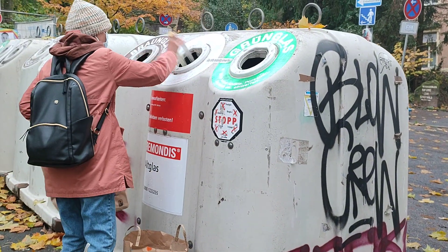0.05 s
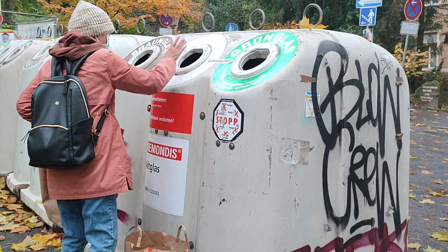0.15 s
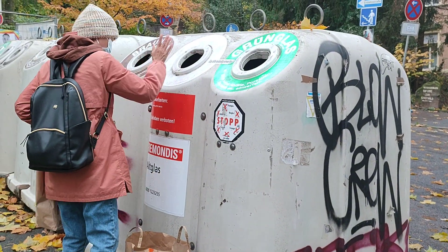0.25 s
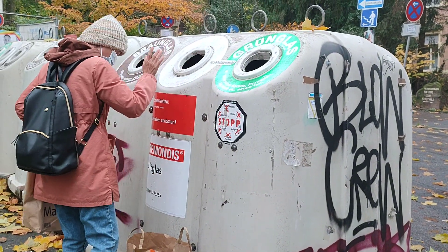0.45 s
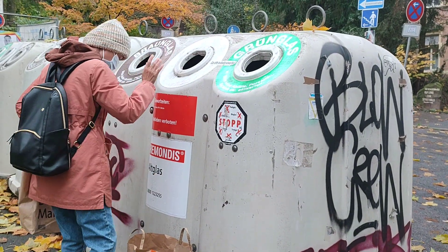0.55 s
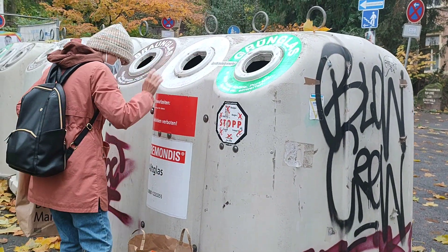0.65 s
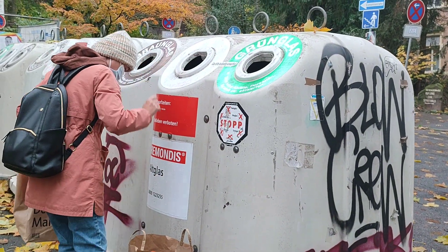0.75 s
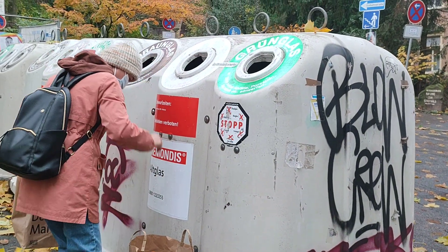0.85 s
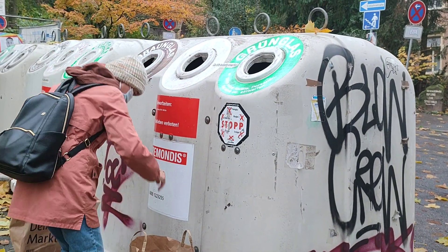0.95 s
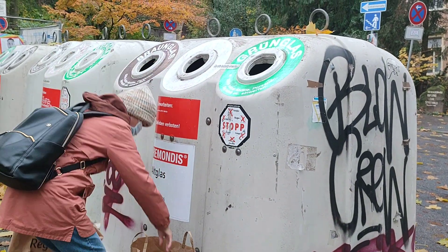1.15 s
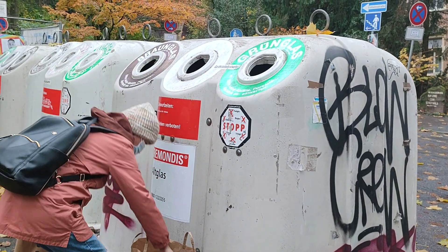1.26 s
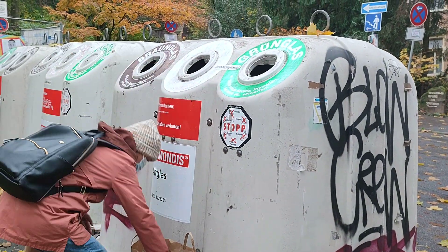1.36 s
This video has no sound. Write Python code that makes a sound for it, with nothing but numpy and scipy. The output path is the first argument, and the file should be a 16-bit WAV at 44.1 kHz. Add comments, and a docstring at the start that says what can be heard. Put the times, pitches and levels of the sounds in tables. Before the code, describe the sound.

Glass clinks and knocks as a bottle falls into a big street container, faint traffic behind

```python
"""Traffic rumbles and hisses far away throughout: shaped noise with drifting level.
Glass bottles scrape a street recycling container's rim (gritty noise bursts), then clink against the pile
(decaying modes per glass object). The big shell booms when one lands (low modes); weaker clinks, scrapes
and thuds follow, with a quick double knock on a small box. The hollow container answers (decaying noise tail)."""
import sys
import numpy as np
from scipy import signal
from scipy.fft import rfft, irfft, next_fast_len
from scipy.io import wavfile
from scipy.ndimage import uniform_filter1d, map_coordinates

SR = 44100
rng = np.random.default_rng(int(sys.argv[2]) if len(sys.argv) > 2 else 0)


def persist_wave(psi):
    """Save psi, clipped to +-1, as 16-bit WAV."""
    counts = np.round(np.clip(psi, -1, 1) * 32767).astype(np.int16)
    wavfile.write(sys.argv[1], SR, np.atleast_2d(counts).T)


def to_linear_factor(level_db):
    """Convert decibel levels (scalar or array-like) to linear amplitude factors."""
    exponent = np.asarray(level_db, float) / 20
    return 10 ** exponent


N = 61739

# modes of each glass object, beamed differently to each side: pitch_hz, left_db, right_db, t60_s
NECK_MODES = [(2793, -1.5, 3.5, 0.078), (3380, -23, -20, 0.065), (3795, -14.5, -13, 0.6),
              (4750, -23, -16, 0.1), (5940, -19, -14, 0.077), (6470, -16, -12, 0.096),
              (7200, -35, -33, 0.072), (7800, -22, -32, 0.069), (8600, -13.5, -35, 0.064),
              (11250, -13.5, -22, 0.067), (11360, -18, -30, 0.081), (12100, -25, -28, .08),
              (12300, -26, -28, 0.061), (13070, -18, -27, 0.045), (13910, -33, -27, .08)]
THIN_MODES = [(2304, -20, -4.5, 0.068), (2480, 0, -13, 0.044), (3670, -12, -29, 0.054),
              (4253, -10, -7, 0.065), (4500, -13, 0, 0.075), (6900, -13, -28, .06), (7120, -22, -9, 0.069),
              (7450, -20, -29, 0.046), (8737, -16, -40, 0.056), (10150, -17, -27, 0.068),
              (11540, -25, -33, .05), (11540, -26, -25, .08), (12750, -36, -36, 0.071),
              (13910, -27, -30, 0.088)]
THICK_MODES = [(2325, -11.5, -22, 0.25), (2487, -29, -8.5, 0.23), (2683, -3, -2.5, 0.25),
               (2901, -0.5, -10, 0.068), (3363, -4.5, -2, 0.058), (4660, -27, -1, 0.043),
               (4590, -14, -26, 0.089), (7063, -34, -23.5, 0.6), (7850, -38, -37, 0.048),
               (8580, -29, -39, .1), (11000, -39, -43, 0.1), (12160, -36, -40, 0.11),
               (13100, -43, -41, 0.086)]
ROUND_MODES = [(2292, -9, -1.5, 0.2), (2694, -6, -2, 0.16), (3050, -12.5, -8, 0.15), (3324, 1.5, -5, 0.095),
               (3555, -12, -2.5, 0.045), (4610, -7, -8.5, 0.062), (7050, -34, -18, 0.054),
               (8870, -17, -39, 0.047), (12680, -28, -28, 0.043)]
SMALL_MODES = [(2918, -4, 1, 0.16), (3085, 2, -14, 0.15), (3500, 1, 6.5, 0.061), (3715, 3.5, -6, .1),
               (4220, -18, -8, .12), (4660, -14, -1.5, 0.14), (6702, -7, -6, 0.086)]
FLAT_MODES = [(2917, -2.5, 2, 0.13), (3289, 3, -34, 0.057), (4110, -23, 1.5, 0.062),
              (4620, -16, -27, 0.077), (4640, -32, -17, 0.075)]
JAR_MODES = [(1500, 5, 6.5, 0.16), (4430, -15, -18, .1), (7180, -26, -17, 0.11), (12000, -25, -30, 0.057)]
GLASS_OBJECTS = [NECK_MODES, THIN_MODES, THICK_MODES, ROUND_MODES, SMALL_MODES, FLAT_MODES, JAR_MODES]
# contacts, one list per glass object in that order: start_s, level_db, rise_s, tilt_db_per_octave
CLINK_BLOWS = [
    [(.394, -16, 0.0061, 1.4), (.411, -16, 0.0028, -4)],
    [(.436, -10.5, 0.0043, -0.9), (.456, -21.5, 0.0014, -0.1)],
    [(.465, -18, 0.0013, 0.7), (.486, -24.5, 0.0033, 5.6)],
    [(.773, -29.5, 0.0036, 1), (.781, -25.5, 0.001, 4.4)],
    [(0.909, -36, 0.0028, 2.7)],
    [(1.018, -33, 0.0038, 7.5), (1.024, -25, 0.0029, -21)],
    [(.468, -42, 0.006, -9.2), (.5, -28, 0.048, -12.2), (.842, -52.5, 0.0047, 13.5),
     (.895, -38, 0.0092, -7), (.912, -34.5, 0.0023, -3), (.99, -62.5, 0.0027, 10.5),
     (1.1, -37.5, 0.0033, -0.3)],
]
# rim and pile scrapes: start_s, level_db, hold_s, t60_s, tilt_db_per_octave
SCRAPE_BURSTS = [(0.2334, -24, 0.0083, 0.036, 0.4), (0.244, -33.5, 0.0051, 0.066, -2),
                 (0.2531, -24.5, 0.0056, 0.041, -1.1), (.392, -30.5, 0.0056, 0.043, 1),
                 (0.395, -25, 0.006, 0.11, 0.5), (.431, -32, 0.0036, 0.13, 1),
                 (.436, -28, 0.0033, 0.12, 0.1), (0.46, -29.5, 0.004, 0.22, 2.8),
                 (.594, -36, 0.011, 0.16, 4.8), (0.771, -36, .015, 0.16, 4.2), (0.839, -48, 0.0072, .2, 6),
                 (.893, -40, 0.0087, 0.065, 0.1), (0.907, -40.5, 0.019, 0.27, 1.9),
                 (1.017, -37, .02, 0.11, -1.9), (1.095, -43.5, 0.014, 0.48, -2.7),
                 (1.197, -52, 0.03, 0.24, 0.2)]
# scrape noise colour: freq_hz, relative_db_per_hz
SCRAPE_SPECTRUM = [(88, -27), (150, -3.5), (343, -5.5), (495, -4.5), (787, -1), (3210, -8), (4210, -11),
                   (5720, -17), (7210, -16), (10400, -26.5), (12100, -25.5), (15000, -50)]
# scrape weighting, left over right: freq_hz, left_minus_right_db
SCRAPE_SIDES = [(60, -0.5), (110, 0.0), (200, 4), (380, 7.5), (690, 0.5), (1280, -6.5), (2350, -5),
                (4330, -7), (7980, 0), (14700, 2)]
# container shell modes: pitch_hz, relative_db, t60_s
SHELL_MODES = [(69, -13, 0.27), (99.2, -2.5, 0.11), (135.4, 0, 0.12), (165.3, 3.5, 0.088), (193, 2, .16),
               (247.8, 2, 0.099), (325.3, -1, 0.11), (382.4, -2.5, 0.089), (474, -22, 0.11),
               (605.5, -4.5, 0.078), (734, -13, .07), (763.5, -13, 0.12), (831, -20.5, 0.21)]
# blows on the shell: start_s, level_db, hardness_db_per_octave
SHELL_BLOWS = [(0.253, -38, -14), (.393, -42, 9.5), (.468, -32, -2.8), (0.496, -38.5, -15),
               (.594, -15.5, 2), (.602, -15.5, -8.5), (.609, -23, 0.5), (.626, -41.5, 8), (.643, -30, 0.1),
               (0.656, -31, -6), (.685, -40.5, 3), (0.776, -36.5, 0.3), (.83, -47, -18), (0.864, -42.5, -8),
               (.91, -39, 4.9), (1.1, -47.5, -9), (1.2, -44, 0), (1.286, -45, -10)]
# modes of a smaller hollow box: pitch_hz, relative_db, t60_s
BOX_MODES = [(156.4, 5, 0.052), (342, -9, 0.11), (523, -10, 0.14), (689, -9, 0.11)]
# its knocks: start_s, level_db
BOX_BLOWS = [(1.0225, -26.5), (1.035, -26.5)]
# container reverberation: freq_hz, t60_s
HOLLOW_DECAY = [(150, 0.86), (1000, 0.29), (4000, 0.65), (12000, 0.32)]
# left-right likeness of noise and reverberation: freq_hz, correlation
LIKENESS = [(60, 0.99), (130, 0.96), (290, 0.86), (630, 0.19), (1390, 0.079), (3050, -0.036), (6700, 0.055),
            (14700, -0.017)]
# tyre hiss colour: freq_hz, relative_db_per_hz
HISS_SPECTRUM = [(53, -34), (90, -1), (222, -9.5), (263, -4.5), (348, -6.5), (450, -14), (490, -8.5),
                 (1040, -10), (1210, -12.5), (2150, -10), (2610, -19), (2780, -20), (3310, -22.5),
                 (13300, -46.5), (15200, -64)]
# tyre hiss course before trim: time_s, relative_level_db
HISS_COURSE = [(0.0, -46.5), (0.466, -45.5), (0.552, -44.5), (1.004, -46.5), (1.144, -49.5), (1.4, -48.5)]
# engine rumble colour: freq_hz, relative_db_per_hz
RUMBLE_SPECTRUM = [(12, -38), (20, -17.5), (48, -2.5), (61, -6), (81, -15.5), (110, -14), (140, -23),
                   (240, -120)]
# engine rumble course before trim: time_s, relative_level_db
RUMBLE_COURSE = [(0.0, -39), (0.22, -42), (0.392, -38.5), (0.786, -37), (1.156, -38.5), (1.4, -42.5)]
# microphone response: freq_hz, gain_db
MIC_RESPONSE = [(3300, 1.11), (4800, 3.5), (5900, 1), (7200, 7.5), (8600, 1.3), (9300, 0.7), (9800, -9.1),
                (10500, -2), (11500, 0), (13500, 2)]

MODE_SPREAD_DB = .8  # chance level of each mode, per blow
FLUTTER_DB, FLUTTER_KNOTS_PER_S, FLUTTER_HALF_GROWN_S = 2.5, 70, .03
SHIMMER_DB, SHIMMER_TILT_DB_PER_OCTAVE, SHIMMER_MEAN_T60_S = -19, -7.5, 0.096
SHIMMER_LOW_HZ, SHIMMER_HIGH_HZ = 2400, 14200
SCRAPE_RISE_S, GRIT_DB, GRIT_KNOTS_PER_S = 0.00087, 1.8, 900
THUD_RISE_S, SHELL_CUT_HZ = .0015, 61  # the shell radiates little below the cut
GLASS_HOLLOW_DB, BOOM_HOLLOW_DB = -11.5, -14  # sends to the reverberation
HISS_TRIM_DB, RUMBLE_TRIM_DB = 4.5, -3.2


def unit(x):
    """Scale to rms 1."""
    return x / np.sqrt(np.mean(x ** 2) + 1e-20)


def along(points, hz):
    """Interpolate (freq_hz, value) points on a log frequency axis."""
    freq_hz, value = np.transpose(points)
    return np.interp(np.log(hz + 1), np.log(freq_hz + 1), value)


def curve(points):
    """Interpolate (time_s, value) points, one value per sample."""
    return np.interp(np.arange(N) / SR, *np.transpose(points))


def wobble(knots_per_s, size=N):
    """Smooth random curve through normal random knots."""
    knots = rng.standard_normal(int(size * knots_per_s / SR) + 4)
    return map_coordinates(knots, [np.arange(size) * knots_per_s / SR])


def filtered(x, response):
    """Multiply the spectrum of x by a function of frequency."""
    n = x.shape[-1]
    padded = next_fast_len(n + 8192)
    return irfft(rfft(x, padded) * response(np.fft.rfftfreq(padded, 1 / SR)), padded)[..., :n]


def add(into, start_s, sound):
    """Mix a stereo sound in at a time."""
    part = into[:, round(start_s * SR):][:, :sound.shape[1]]
    part += sound[:, :part.shape[1]]


def spread(pair, spectrum):
    """Colour two unrelated noises and blend them into a left and a right that agree in the bass."""
    def angle(hz):
        return np.arccos(np.clip(along(LIKENESS, hz), -1, 1)) / 2

    mid, side = filtered(pair, lambda hz: spectrum(hz) * [np.cos(angle(hz)), np.sin(angle(hz))])
    return unit(np.array([mid + side, mid - side]))


def ring(hz, left_db, right_db, t60_s, rise_s, apart_rad):
    """Struck modes: fluttering exponential decays, new levels per blow, a phase gap between the sides."""
    t = np.arange(SR // 3) / SR
    flutter = np.array([wobble(FLUTTER_KNOTS_PER_S, size=len(t)) for _ in hz])
    flutter_db = FLUTTER_DB * flutter * t / (t + FLUTTER_HALF_GROWN_S)
    chance_db = MODE_SPREAD_DB * rng.standard_normal((len(hz), 1))
    decay_db = -60 * t / np.reshape(t60_s, (-1, 1))
    decay_db = np.broadcast_to(decay_db, flutter.shape)
    fade = to_linear_factor(chance_db + flutter_db + decay_db) * (1 - np.exp(-t / rise_s))
    phase = 2 * np.pi * hz[:, None] * t
    left = to_linear_factor(left_db) @ (fade * np.sin(phase))
    right = to_linear_factor(right_db) @ (fade * np.sin(phase + apart_rad))
    return np.array([left, right])


def clinks():
    """Each contact rings one glass object; its tilt weights the modes above the first."""
    out = np.zeros((2, N))
    for modes, blows in zip(GLASS_OBJECTS, CLINK_BLOWS):
        hz, left_db, right_db, t60_s = np.transpose(modes)
        for start_s, level_db, rise_s, tilt_db in blows:
            db = level_db + tilt_db * np.log2(hz / hz[0])
            glass = ring(hz, db + left_db, db + right_db, t60_s, rise_s, np.pi / 2)
            add(out, start_s, glass + shimmer(level_db, rise_s, count=20))
    return out


def shimmer(level_db, rise_s, count):
    """Neighbouring glass answers a clink with weak modes at chance pitches."""
    pitch, life, left, right = rng.random((4, count))
    hz = SHIMMER_LOW_HZ + (SHIMMER_HIGH_HZ - SHIMMER_LOW_HZ) * pitch
    db = level_db + SHIMMER_DB + SHIMMER_TILT_DB_PER_OCTAVE * np.log2(hz / SHIMMER_LOW_HZ)
    t60_s = SHIMMER_MEAN_T60_S * (.5 + life)
    return ring(hz, db - 12 * left, db - 12 * right, t60_s, rise_s, np.pi / 2)


def scrapes():
    """Gritty bursts of contact noise: a quick start, a hold, a decay."""
    out, size = np.zeros((2, N)), SR // 3
    t = np.arange(size) / SR
    for start_s, level_db, hold_s, t60_s, tilt_db in SCRAPE_BURSTS:
        def spectrum(hz):
            return to_linear_factor(along(SCRAPE_SPECTRUM, hz) + tilt_db * np.log2(hz / 2000 + 0.15))

        noise = spread(rng.standard_normal((2, size)), spectrum)
        grit_db = GRIT_DB * wobble(GRIT_KNOTS_PER_S, size=size)
        decay_db = -60 * np.maximum(t - hold_s, 0) / t60_s
        rise = 1 - np.exp(-t / SCRAPE_RISE_S)
        add(out, start_s, noise * to_linear_factor(level_db + grit_db + decay_db) * rise)
    return filtered(out, lambda hz: to_linear_factor(np.outer([.5, -.5], along(SCRAPE_SIDES, hz))))


def thuds():
    """Low modes of the shell, struck by falling bottles, and of the small box, high-passed."""
    out = np.zeros((2, N))
    hz, mode_db, t60_s = np.transpose(SHELL_MODES)
    for start_s, level_db, hardness_db in SHELL_BLOWS:
        db = level_db + mode_db + hardness_db * np.log2(hz / 200)
        add(out, start_s, ring(hz, db - .4, db, t60_s, THUD_RISE_S, hz[:, None] / 1500))
    hz, mode_db, t60_s = np.transpose(BOX_MODES)
    for start_s, level_db in BOX_BLOWS:
        db = level_db + mode_db
        add(out, start_s, ring(hz, db, db, t60_s, THUD_RISE_S, 0))
    return filtered(out, lambda hz: -(1j * hz / (SHELL_CUT_HZ + 1j * hz)) ** 2)


def hollow(x):
    """The container's reverberation: convolution with decaying noise, near mono in the bass."""
    hz, t, z = signal.stft(rng.standard_normal((2, SR // 2)), SR, nperseg=256)
    same = np.clip(along(LIKENESS, hz), 0, 1)[:, None]
    z = np.array([z[0], same * z[0] + np.sqrt(1 - same ** 2) * z[1]])
    decay = to_linear_factor(-60 * t / along(HOLLOW_DECAY, hz)[:, None])
    tail = signal.istft(z * decay, SR, nperseg=256)[1]
    tail = tail / np.linalg.norm(tail[0])
    return signal.fftconvolve(x.mean(axis=0)[None], tail, axes=1)[:, :N]


def traffic():
    """Far tyre hiss and a lumpy engine rumble: noises whose levels wander."""
    hiss_db = curve(HISS_COURSE) + HISS_TRIM_DB + 0.81 * wobble(7.3)
    rumble_db = curve(RUMBLE_COURSE) + RUMBLE_TRIM_DB + 0.66 * wobble(10.85)
    hiss = to_linear_factor(hiss_db) * rush(HISS_SPECTRUM, patchy_db=1.6)
    return hiss + to_linear_factor(rumble_db) * rush(RUMBLE_SPECTRUM, patchy_db=.6)


def rush(spectrum, patchy_db):
    """Stereo noise of rms 1 with time-frequency patches of random gain."""
    z = signal.stft(rng.standard_normal((2, N + 512)), nperseg=512)[2]
    field = uniform_filter1d(rng.standard_normal(z.shape[1:]), size=5, axis=0)
    field = uniform_filter1d(field, size=10, axis=1)
    pair = signal.istft(z * to_linear_factor(patchy_db * unit(field)), nperseg=512)[1][:, :N]
    return spread(pair, lambda hz: to_linear_factor(along(spectrum, hz)))


def scene():
    """Bottles, shell, their echo and the street."""
    glass = clinks() + scrapes()
    boom = thuds()
    echo = hollow(to_linear_factor(GLASS_HOLLOW_DB) * glass + to_linear_factor(BOOM_HOLLOW_DB) * boom)
    return glass + boom + echo + traffic()


def low_pass(x):
    """Removes everything above the highest recorded frequency."""
    return signal.sosfilt(signal.butter(12, 15310, fs=SR, output="sos"), x)


def record(dry):
    """Microphone colour on the whole mix."""
    mix = filtered(dry, lambda hz: to_linear_factor(along(MIC_RESPONSE, hz)))
    return low_pass(mix)


dry = scene()
out = record(dry)
persist_wave(out)
```